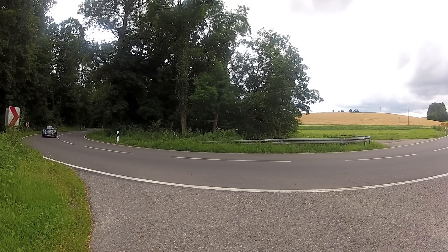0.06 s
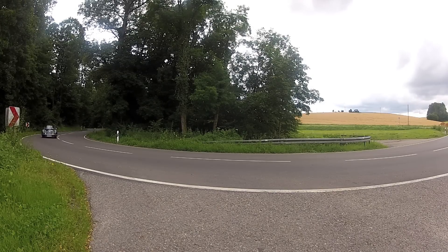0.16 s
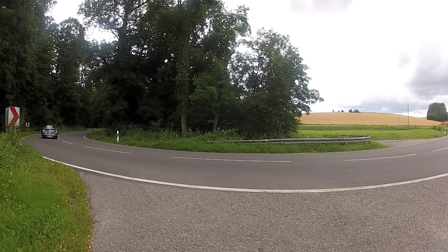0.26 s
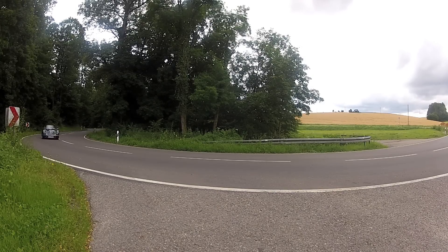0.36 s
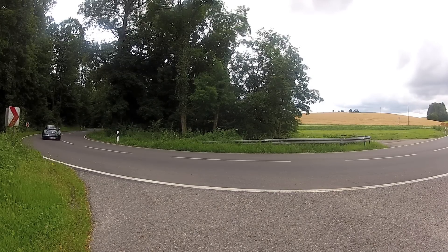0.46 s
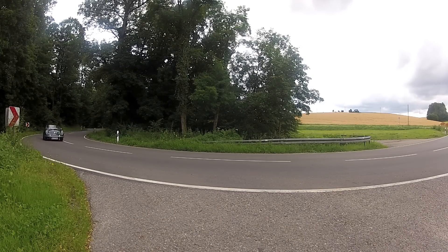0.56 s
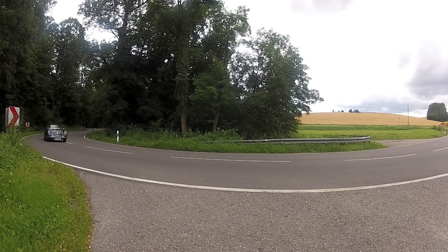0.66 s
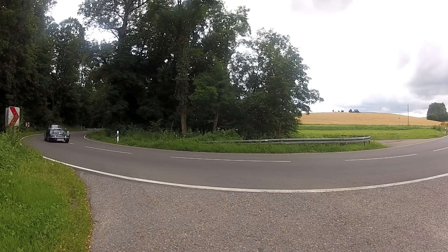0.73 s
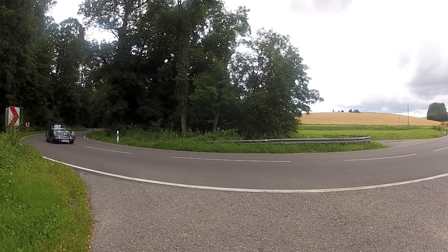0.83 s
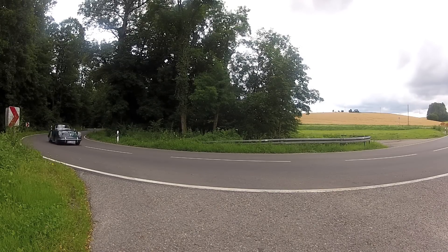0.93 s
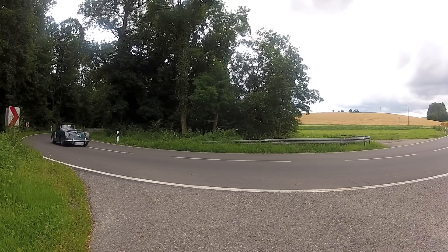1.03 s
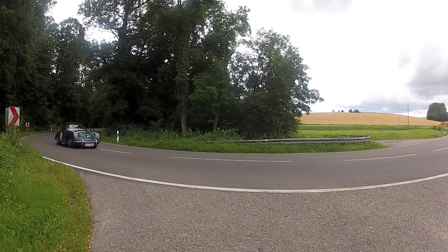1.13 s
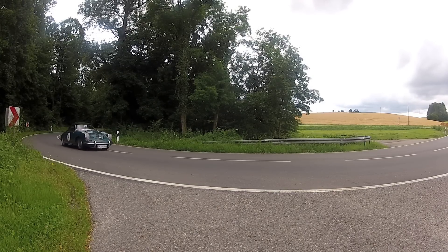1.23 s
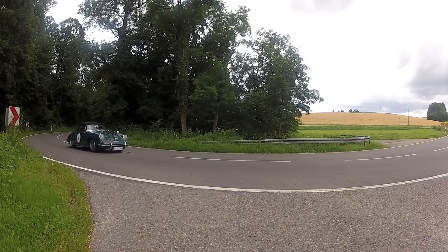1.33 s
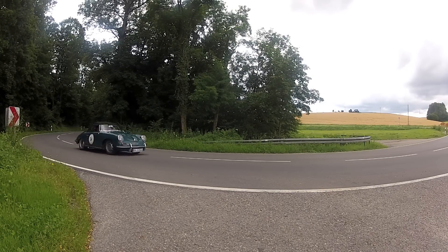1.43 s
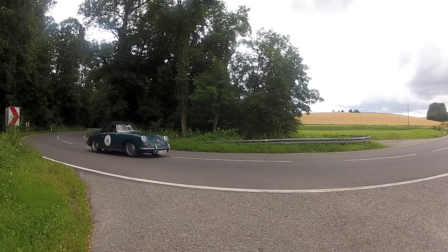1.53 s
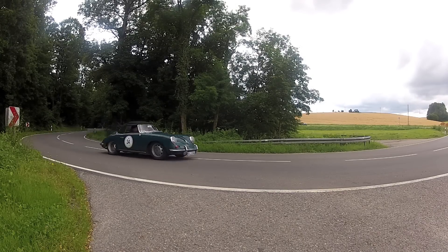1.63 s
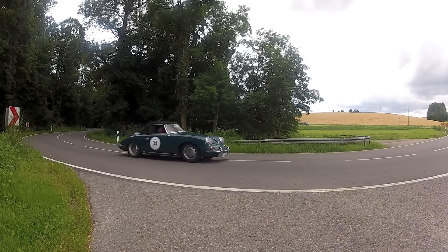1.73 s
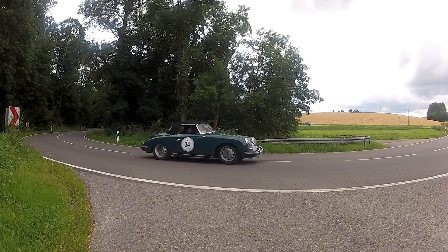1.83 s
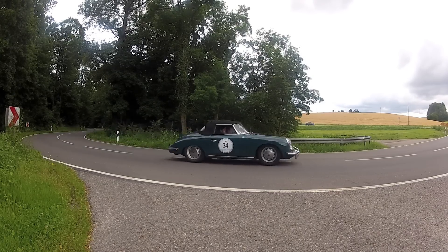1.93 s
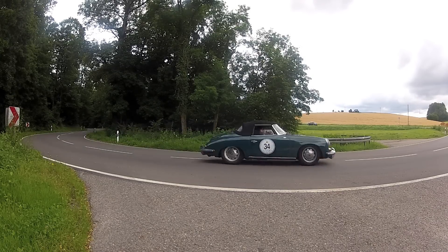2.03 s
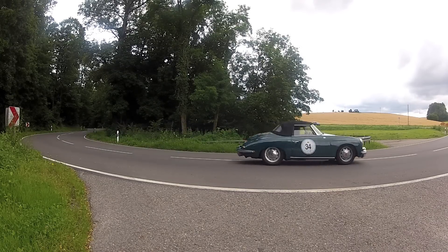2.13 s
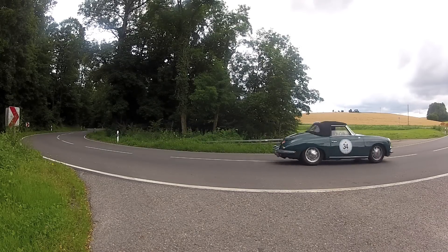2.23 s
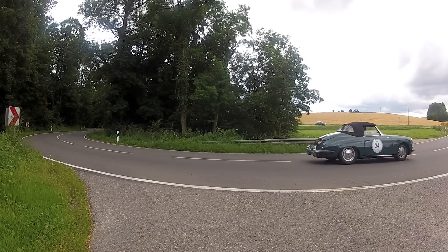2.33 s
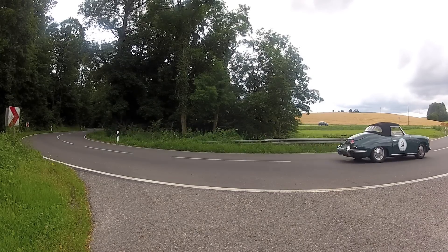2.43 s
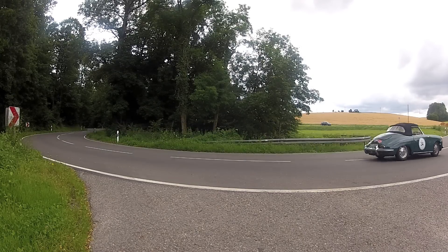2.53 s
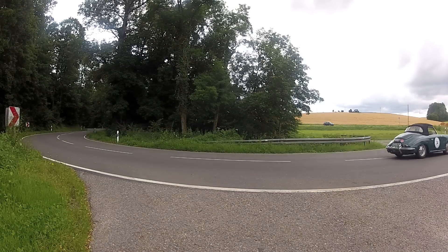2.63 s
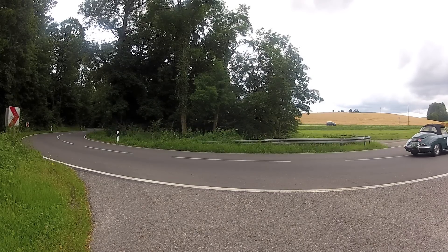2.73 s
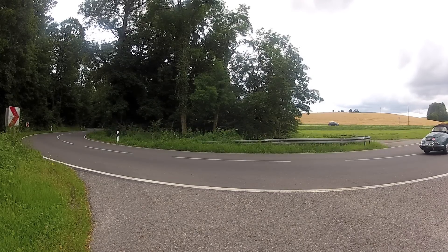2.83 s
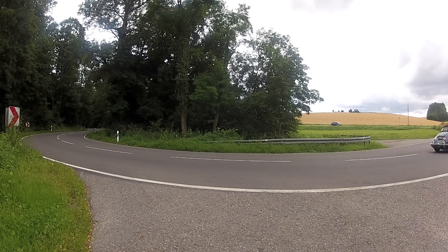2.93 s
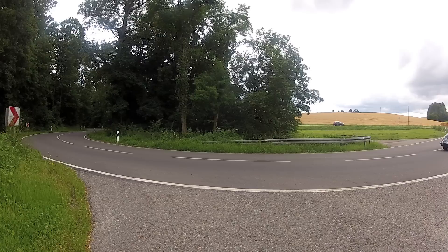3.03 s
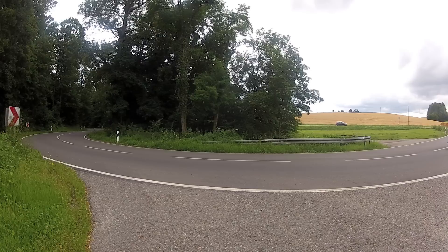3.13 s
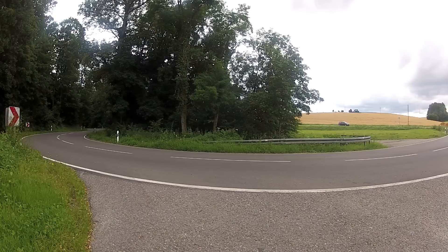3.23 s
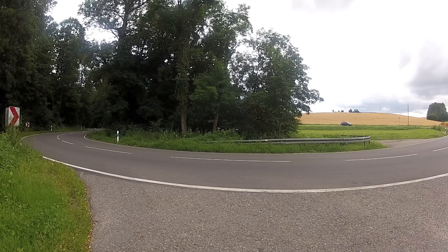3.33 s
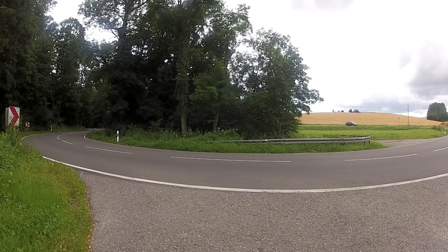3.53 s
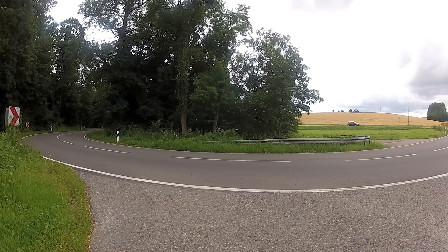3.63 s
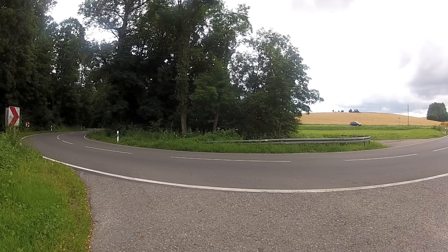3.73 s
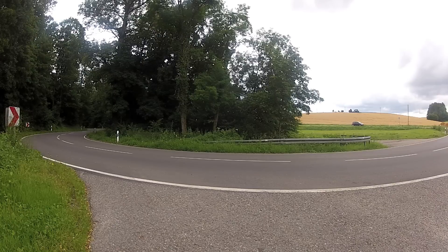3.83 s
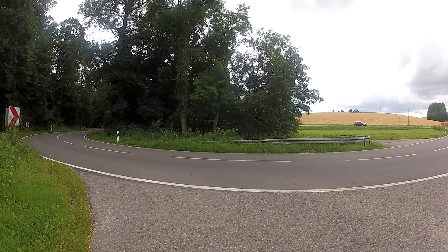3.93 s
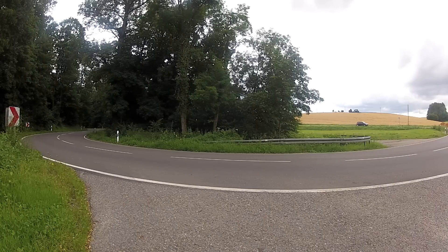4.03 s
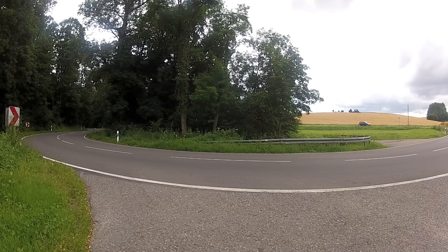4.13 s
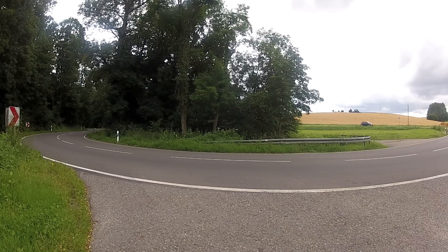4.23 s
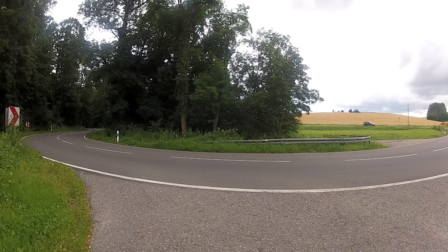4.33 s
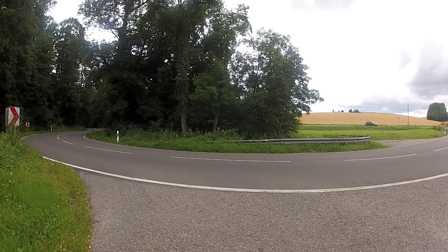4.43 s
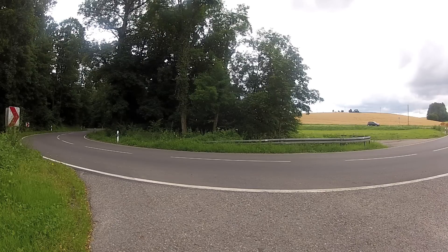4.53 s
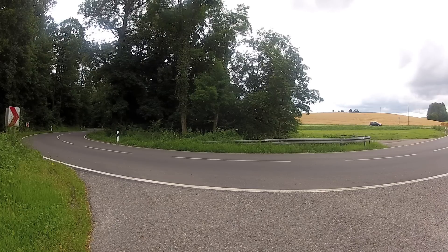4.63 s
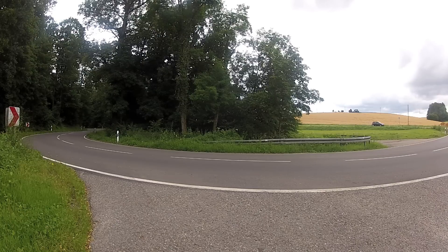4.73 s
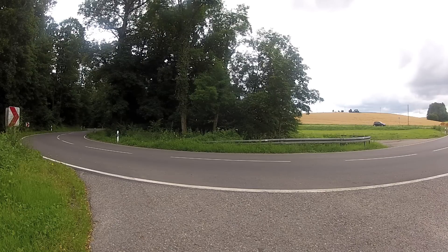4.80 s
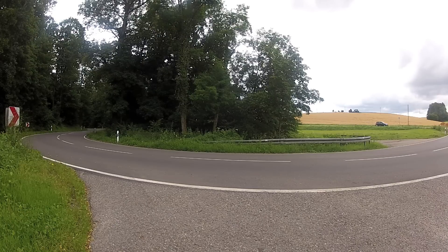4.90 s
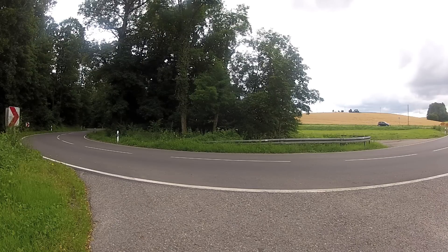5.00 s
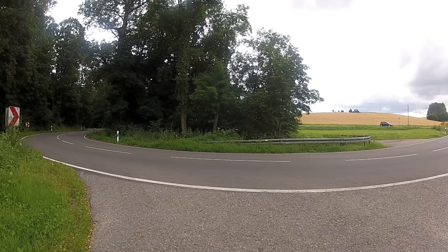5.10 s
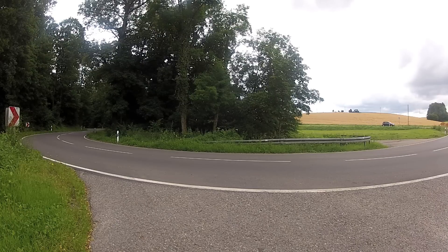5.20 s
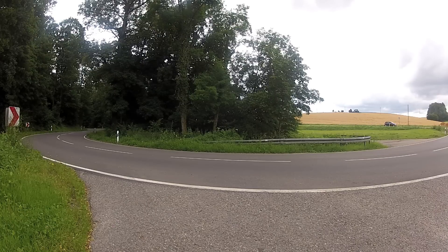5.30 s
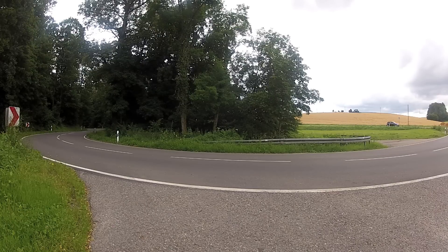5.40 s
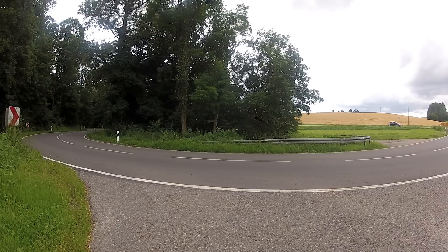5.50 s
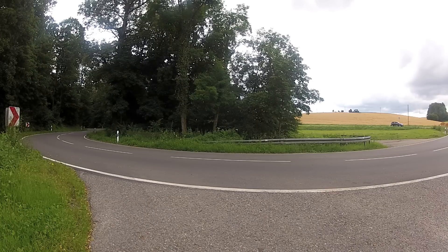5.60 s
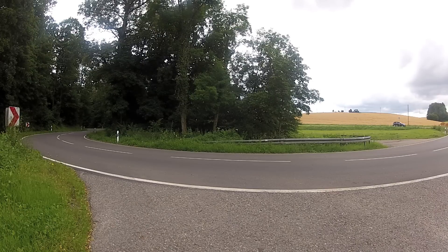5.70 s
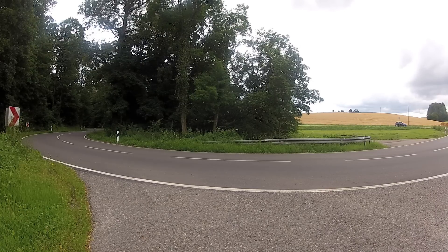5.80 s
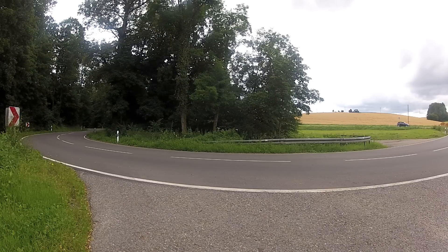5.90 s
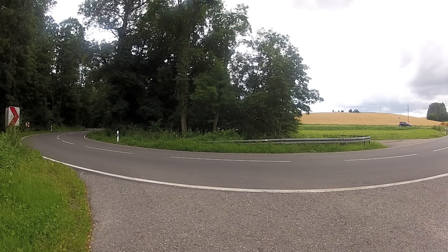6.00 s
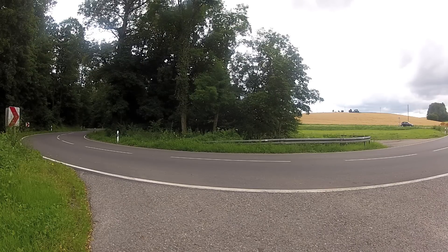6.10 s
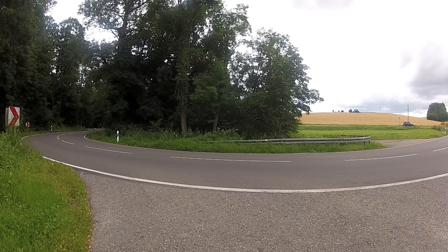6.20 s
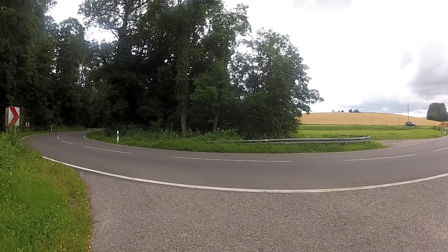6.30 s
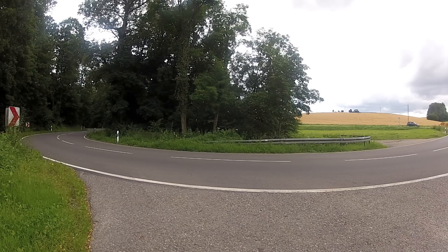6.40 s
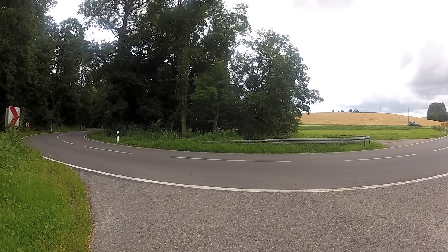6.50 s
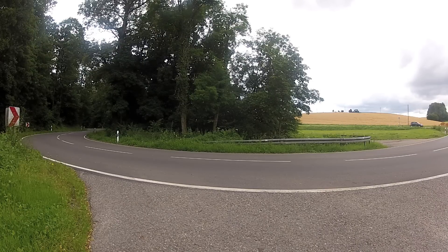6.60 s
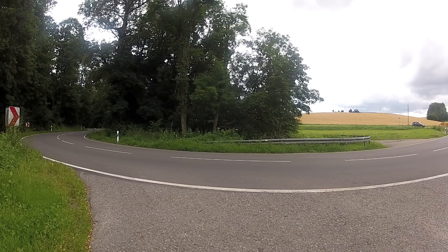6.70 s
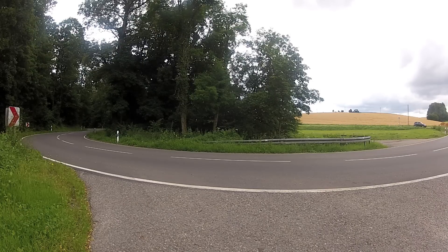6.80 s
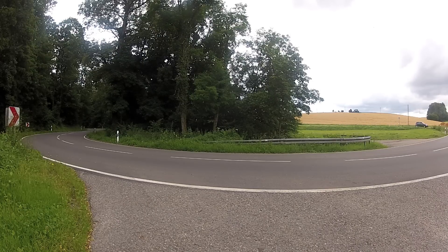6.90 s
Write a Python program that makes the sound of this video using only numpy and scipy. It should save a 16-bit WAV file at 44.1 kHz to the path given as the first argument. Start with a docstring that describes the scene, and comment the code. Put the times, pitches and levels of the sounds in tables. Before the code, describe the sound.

An old air-cooled sports car drones toward a roadside spot, sweeps past with a throaty roar, then recedes and eases off the throttle.

```python
"""The exhaust of an old sports car with an air-cooled flat-four drones as it rounds a country bend and goes by.
It is a sum of harmonics of the firing rate, with weaker tones from unequal cylinders and a pipe resonance.
Coloured noise makes the roar of tyres and gas, the clatter and the rumble; the fan whines as the tail swings by.
The throttle closes in the distance. A short falling tone, dry ticks and faint open air complete the scene.
A 12 kHz sample-and-hold adds a thin fizz on top."""
import sys
import numpy as np
from scipy import signal
from scipy.fft import rfft, irfft, next_fast_len
from scipy.io import wavfile

SR = 44100
rng = np.random.default_rng(int(sys.argv[2]) if len(sys.argv) > 2 else 0)


def generate_wav(sig):
    """Save sig (samples, or channels by samples) to the path in sys.argv[1] as 16-bit PCM at SR."""
    pcm = np.round(np.clip(np.atleast_2d(sig).T, -1, 1) * 32767).astype(np.int16)
    wavfile.write(sys.argv[1], SR, pcm)


N = 306495
TIME = np.arange(N) / SR


def amp(db):
    """Level definition: decibels to amplitude gain."""
    return 10 ** (np.asarray(db) / 20)


def unit(x):
    """Normalisation: scales to an rms of one."""
    return x / np.sqrt(np.mean(x ** 2) + 1e-20)


def curve(rows, column=1):
    """Linear interpolation: one column of a table, joined by straight lines over time."""
    table = np.transpose(rows)
    return np.interp(TIME, table[0], table[column])


def ramp(start_s, length_s):
    """Linear transition: goes from zero to one over the given time."""
    return np.clip((TIME - start_s) / max(length_s, 1 / SR), 0, 1)


def swells(rows, skirt=3.0):
    """Superposition of bells: gain that rises and falls once for each row."""
    gain = 0
    for centre_s, half_width_s, db in rows:
        distance = (TIME - centre_s) / half_width_s
        gain = gain + amp(db) * (1 + distance ** 2 / skirt) ** -skirt
    return gain


def waver(rate_hz):
    """Low-pass random modulation: smooth chance of rms one, mostly below the given rate."""
    step = 100  # samples between the points of the slow curve
    spectrum = rfft(rng.standard_normal(N // step + 2))
    hz = np.linspace(0, SR / step / 2, len(spectrum))
    slow = irfft(spectrum / (1 + (hz / rate_hz) ** 4))
    return unit(np.interp(np.arange(N) / step, np.arange(len(slow)), slow))


def colour(x, points):
    """Linear filtering: shapes the spectrum through (frequency [Hz], level [dB per Hz]) points."""
    points_hz, points_db = np.transpose(points)
    size = next_fast_len(N)
    hz = np.fft.rfftfreq(size, 1 / SR)
    low_skirt = np.minimum(hz / points_hz[0], 1) ** 2
    high_skirt = np.minimum(points_hz[-1] / (hz + 1), 1) ** 4
    db = np.interp(np.log(hz + 1), np.log(points_hz), points_db)
    return irfft(rfft(x, size) * low_skirt * high_skirt * amp(db), size)[:N]


# When the car is level with the microphone, how near and how fast, and when the driver lifts off
LEVEL_S, NEAREST_M, CAR_M_PER_S, LIFT_S = 2.174, 7.4, 14.4, 5.19


def passing(peak_db, lag_s, coming_db, going_db, lift_db, lift_takes_s):
    """Distance law: gain of one part falls per doubling of distance, and again when the throttle closes."""
    along_m = CAR_M_PER_S * (TIME - LEVEL_S - lag_s)
    doublings = np.log2(np.hypot(NEAREST_M, along_m) / NEAREST_M)
    db_per_doubling = np.where(along_m < 0, coming_db, going_db)
    return amp(peak_db - db_per_doubling * doublings - lift_db * ramp(LIFT_S, lift_takes_s))


# Side of the car that faces the microphone: (time [s], side [0 nose, 1 flank, 2 tail])
FACING = [(.9, 0.036), (1.6, .62), (2.55, 1.1), (2.8, 1.57), (3.6, 1.43), (4.8, 1.93)]


def by_facing(x, spectra, band):
    """Directivity: blends the colours of nose, flank and tail, each of rms one within the band."""
    sos = signal.butter(4, band, "bandpass", fs=SR, output="sos")
    facing = np.clip(curve(FACING), 0, 2)
    out = 0
    for side, points in enumerate(spectra):
        coloured = colour(x, points)
        share = np.maximum(1 - abs(facing - side), 0)
        out = out + share * coloured / np.std(signal.sosfilt(sos, coloured))
    return out


# Strength of the four firings of one engine cycle: (level [dB])
CYLINDERS = [0.38, 0.085, -0.094, -0.26]


def puffs(turns, depth, decay):
    """Amplitude modulation: noise swells at each firing, by the strength of that cylinder."""
    strength = amp(CYLINDERS)[np.floor(turns).astype(int) % len(CYLINDERS)]
    swell = 1 + depth * np.exp(-(turns % 1) / decay)
    return strength * swell * rng.standard_normal(N)


# Engine firings as heard at the roadside: (time [s], firing rate [Hz])
FIRING_RATE = [(0, 62.16), (.7, 59.16), (1.2, 57.9), (1.7, 57.51), (2.3, 55.91), (2.6, 55.58), (3.1, 55.32),
               (3.6, 55.84), (4.1, 55.1), (4.4, 54.2), (5.15, 52.46), (5.3, 50.86), (5.7, 45.44),
               (6.3, 42.63), (6.95, 41.83)]


def firing_turns():
    """Phase is the integral of frequency: firings counted since the start."""
    return np.cumsum(curve(FIRING_RATE)) / SR


# How the exhaust carries, one row each for harmonics 1 to 4; parts that sound backwards peak late:
# (gain when nearest [dB], lag [s], loss per doubling of distance coming [dB], same going [dB],
#  loss off the throttle [dB], time this takes [s])
DRONE = [(-23, 0.5, 6, 5.4, 9.5, 0.87), (-30, 0.76, 6.5, 4.7, 20, 0.48), (-28.5, 0.58, 7, 3.28, 20, 1.46),
         (-36.5, 0.51, 5.5, 11.9, 17, .45)]
# How the tones of the unequal cylinders carry: same columns
BOOM = (-28.5, 0.22, 7.5, 6, 19, 0.5)
# Tones of the unequal cylinders: (multiple of the firing rate, level against the boom [dB])
UNEVEN = [(.75, -26), (1.25, -20), (1.5, -13), (1.75, -21), (2.25, -21), (2.5, -9.5), (2.75, -11.5),
          (3.25, -17), (3.5, -18), (3.75, -12), (4.25, -12.5), (4.5, -21), (4.75, -21.5)]
# The whole drone sags at about 1.6 s, recovers as the car passes, and swells once near 3.85 s:
# (time [s], gain [dB])
SURGE = [(0, -1.5), (1.1, 0.9), (1.6, -3), (2.05, 0), (2.4, 0), (2.7, -0.9), (3.7, -0.3), (3.85, 2.4),
         (4.6, -2)]
# Resonance of the exhaust pipe, which lifts a harmonic that slides through it
PIPE_HZ, PIPE_WIDTH_HZ, PIPE_DB = 141.8, 19.7, 8
# The drone turns hollow as the car draws away: its 2nd harmonic drops
HOLLOW_S, HOLLOW_TAKES_S, HOLLOW_DB = 3.5, 0.17, 9


def exhaust(turns, flutter=0.047, swing_db=0.32, jitter=0.026, smear=0.22):
    """Fourier series: harmonics of the firing rate, and quarter steps from the four-cylinder cycle."""
    gains = [amp(curve(SURGE)) * passing(*part) for part in DRONE]
    gains[1] = gains[1] * amp(-HOLLOW_DB * ramp(HOLLOW_S, HOLLOW_TAKES_S))
    out = np.zeros(N)
    for k, gain in enumerate(gains, 1):
        detuning = 2 * (k * curve(FIRING_RATE) - PIPE_HZ) / PIPE_WIDTH_HZ
        pipe_db = PIPE_DB / (1 + detuning ** 2)
        # pulses are sharp from the front; towards the tail the higher harmonics lag and spread them out
        phase = 2 * np.pi * k * turns - smear * curve(FACING) * k ** 2 + jitter * k * waver(19)
        # outdoors, higher harmonics fade in and out more
        fading = amp(pipe_db + swing_db * k * waver(2.4)) * (1 + flutter * waver(2.9))
        out -= gain * fading * np.cos(phase)
    boom = passing(*BOOM)
    for multiple, db in UNEVEN:
        quarter_step = np.round(4 * multiple) / 4
        tone = np.cos(2 * np.pi * (quarter_step * turns + rng.random()))
        out += boom * amp(db) * (1 + 0.26 * waver(1.7)) * tone
    return np.sqrt(2) * out


def growl(turns, drift=0.45):
    """Periodicity gives a line spectrum: a ragged gas burst returns every four firings, as a dense comb."""
    cycles = turns / len(CYLINDERS)
    comb = 0
    for k in range(20, 64):
        comb = comb + np.cos(2 * np.pi * (k * cycles + rng.random()) + drift * waver(3))
    # as strong per Hz as white noise of rms one
    return 2 * np.sqrt(np.gradient(cycles)) * comb


# How tyres and exhaust gas carry: (gain when nearest [dB], lag [s], loss per doubling coming [dB],
# same going [dB], loss off the throttle [dB], time this takes [s])
ROAR = (-30.5, 0.19, 5.9, 5, 4.3, 0.56)
# Brief swells of the roar as the car draws away: (time [s], half-width [s], gain [dB])
ROAR_SWELLS = [(3.27, 0.2, -48), (5.63, 0.032, -50.5)]
# Roar heard from nose, flank and tail: (frequency [Hz], level [dB per Hz])
ROAR_NOSE = [(150, 1), (240, -11), (300, -3), (390, 2), (470, -2.5), (550, -8.5), (680, -7), (900, -22.5),
             (1400, -56)]
ROAR_FLANK = [(150, -5.5), (240, 5.5), (300, -1.5), (440, -3), (540, 0), (660, -3), (780, -9), (900, -11),
              (1400, -42.5)]
ROAR_TAIL = [(150, -8), (240, -4), (330, -1.5), (410, -0.5), (470, -6.5), (600, -0.5), (720, 0),
             (820, -11.5), (980, -15.5), (1400, -26.5)]
# Band in which the roar has rms one: (lower edge [Hz], upper edge [Hz])
ROAR_BAND = (240, 900)


def roar(turns, locked=0.3):
    """Power addition of incoherent sources: dark tyre noise and growling gas, the latter a locked share."""
    gas = np.sqrt(locked) * growl(turns)
    rush = np.sqrt(1 - locked) * unit(puffs(turns, depth=0.086, decay=0.4))
    gain = passing(*ROAR) + swells(ROAR_SWELLS)
    return gain * by_facing(gas + rush, (ROAR_NOSE, ROAR_FLANK, ROAR_TAIL), ROAR_BAND)


# How the valve gear and tread hiss carry: (gain when nearest [dB], lag [s], loss per doubling coming [dB],
# same going [dB], loss off the throttle [dB], time this takes [s])
CLATTER = (-47.5, 0.1, 5.5, 4, 3, 0.1)
# Engine clatter and tread hiss from nose, flank and tail: (frequency [Hz], level [dB per Hz])
HISS_NOSE = [(700, 0), (1000, -2), (1350, -10.5), (2000, 2), (2350, -2.5), (2650, -6.5), (3050, -2),
             (3500, -15.5), (3950, -12.5), (4400, -13), (5300, -16), (6000, -23)]
HISS_FLANK = [(700, -1), (1000, 7), (1400, 1), (1950, 4.5), (2400, 2), (2800, -2), (3150, 7), (3500, -4.5),
              (3900, -4), (4400, -10.5), (5300, -8), (6000, -19.5)]
HISS_TAIL = [(700, -17), (1000, -10), (1400, -5), (1850, 1), (2150, -3), (2340, 3.5), (2550, -7.5),
             (2800, -5), (3130, 1.5), (3600, -8), (4400, -14), (5200, -11), (6000, -17.5)]
# Band in which the hiss has rms one: (lower edge [Hz], upper edge [Hz])
HISS_BAND = (1500, 5000)


def clatter(turns, grit_db=8, grit_per_s=200):
    """Random impulses on modulated noise: valve gear beats with the firings, grit crackles under the tread."""
    struck = rng.random(N) < grit_per_s / SR
    grit = rng.standard_normal(N) * struck * amp(grit_db)
    source = puffs(turns, depth=0.14, decay=0.34) + grit
    return passing(*CLATTER) * by_facing(source, (HISS_NOSE, HISS_FLANK, HISS_TAIL), HISS_BAND)


# The engine bay is heard directly as the car draws level: (time [s], half-width [s], gain [dB])
BAY = [(2.26, 0.3, -34)]
# Resonances of the bay: (frequency [Hz], width [Hz], relative level [dB])
BAY_MODES = [(553, 87, 1.5), (637, 51, -1), (3256, 210, -19), (3850, 680, -29.5)]


def engine_bay(turns):
    """Cavity resonance: throbbing intake air rings in the space under the engine lid."""
    rush = puffs(turns, depth=0.32, decay=0.3)
    ringing = 0
    for hz, width, db in BAY_MODES:
        sos = signal.butter(2, [hz - width / 2, hz + width / 2], "bandpass", fs=SR, output="sos")
        ringing = ringing + amp(db) * signal.sosfilt(sos, rush)
    return swells(BAY) * unit(ringing)


# The whine swells twice as the tail swings by: (time [s], half-width [s], gain [dB])
FAN = [(2.45, 0.24, -51), (3.35, 0.31, -54)]
# Tones of the fan and its drive: (multiple of the firing rate, level against the whine [dB])
FAN_TONES = [(12, 10.5), (23.02, -5.5), (34.6, -11), (42, -9)]


def fan(turns, blur=0.03):
    """Rotating-blade tones: the belt-driven fan follows the engine; turbulence blurs its phase."""
    tones = 0
    for multiple, db in FAN_TONES:
        phase = 2 * np.pi * multiple * turns + blur * multiple * waver(19)
        tones = tones + amp(db) * np.cos(phase)
    return np.sqrt(2) * swells(FAN) * tones


# How the air from the tread carries: (gain when nearest [dB], lag [s], loss per doubling coming [dB],
# same going [dB], loss off the throttle [dB], time this takes [s])
TREAD = (-50.5, .55, 13.5, 5.5, 5.5, 0)
# Rush of that air, thrown mostly backwards: (frequency [Hz], level [dB per Hz])
TREAD_COLOUR = [(750, -12), (980, 1), (1550, 0.5), (2100, -12.5)]


def tread():
    """Air-pumping noise: air squeezed out of the tread rushes near 1 kHz behind the car."""
    return passing(*TREAD) * unit(colour(rng.standard_normal(N), TREAD_COLOUR))


# A faint metallic chirp from the tail of the car: (time [s], half-width [s], gain [dB])
CHIRP = [(3.05, 0.78, -72)]
# Its spectrum: (frequency [Hz], level [dB per Hz])
CHIRP_COLOUR = [(4300, -35), (4750, 2), (4950, 3), (5400, -27)]


def chirp(turns, decay=0.2):
    """Repeated decay: one short ring of metal, as band noise, in every engine cycle, of uneven strength."""
    cycle_phase = turns / len(CYLINDERS) % 1
    beat = np.exp(-cycle_phase / decay) * amp(3.5 * waver(8))
    return swells(CHIRP) * unit(colour(beat * rng.standard_normal(N), CHIRP_COLOUR))


# A brief low tone slides down as the car draws away: (time [s], frequency [Hz], level [dB])
SLIDE = [(4.03, 345.4, -52), (4.09, 344.4, -36), (4.13, 318.5, -40), (4.17, 268.6, -42), (4.23, 228.2, -44)]


def slide(blur=0.56):
    """Frequency modulation: a short falling tone, made fuzzy by random phase."""
    sounding = (TIME > SLIDE[0][0]) & (TIME < SLIDE[-1][0])
    phase = 2 * np.pi * np.cumsum(curve(SLIDE)) / SR + blur * waver(40.3)
    return np.sqrt(2) * sounding * amp(curve(SLIDE, column=2)) * np.cos(phase)


# Small dry ticks near the microphone: (time [s], gain [dB])
TICKS = [(.621, -51), (.667, -51), (.675, -50), (2.03, -49), (2.902, -55), (2.923, -52), (3.049, -57),
         (3.407, -53)]
# Their spectrum: (frequency [Hz], level [dB per Hz])
TICK_COLOUR = [(2000, -20), (3800, 5), (5500, 9), (7500, -18), (10000, -20)]


def ticks(decay_s=0.0029):
    """Exponential decay: bright noise bursts a few milliseconds long."""
    envelope = 0
    for start_s, db in TICKS:
        envelope = envelope + amp(db) * (TIME >= start_s) * np.exp(-abs(TIME - start_s) / decay_s)
    return envelope * unit(colour(rng.standard_normal(N), TICK_COLOUR))


# The rumble gives way to clean tones while the tailpipe points at the microphone: (time [s], level [dB])
RUMBLE = [(0, -38), (1.3, -38), (1.75, -28.5), (2.5, -34.5), (2.9, -40), (3.7, -37.5), (5.3, -40),
          (5.8, -43), (6.95, -44.5)]
# Its spectrum: (frequency [Hz], level [dB per Hz])
RUMBLE_COLOUR = [(20, -21), (34, -18), (45, 2), (85, 1.5), (115, -1.5), (150, 9), (195, -6.5), (230, -1),
                 (300, -8.5), (400, -34)]


def rumble():
    """Broadband noise: diffuse low sound of road and exhaust, between the engine's tones."""
    return amp(curve(RUMBLE)) * unit(colour(rng.standard_normal(N), RUMBLE_COLOUR))


# Faint steady hiss of the open air: (frequency [Hz], level [dB per Hz])
AIR = [(900, -21), (2000, -10), (3100, 4), (3800, 1.5), (5200, 0.5), (6000, -9)]


def air(level_db=-69):
    """Stationary background noise: the hiss that remains when the car is far away."""
    return amp(level_db) * unit(colour(rng.standard_normal(N), AIR))


def scene():
    """Superposition: one crankshaft times the engine's parts, and the other sounds add to them."""
    turns = firing_turns()
    engine = exhaust(turns) + clatter(turns) + engine_bay(turns) + fan(turns) + chirp(turns)
    car = engine + roar(turns) + tread()
    return (car + slide() + ticks() + rumble() + air())[None]


HOLD_HZ, EDGE_HZ = 12000, 15290  # sampling rate of the hold; upper band limit


def record(dry):
    """Sample-and-hold imaging: the steps mirror the sound around 12 kHz; then the band limit."""
    coarse = signal.resample_poly(dry, HOLD_HZ, SR, axis=1, window=("kaiser", 8))
    stairs = np.repeat(coarse, 8, axis=1)  # each sample is held for eight fine steps
    held = signal.resample_poly(stairs, SR, 8 * HOLD_HZ, axis=1)[:, :N]
    low_pass = signal.firwin(1023, EDGE_HZ, window=("kaiser", 9), fs=SR)
    return signal.oaconvolve(held, low_pass[None], "same")


dry = scene()
out = record(dry)
generate_wav(out)
```